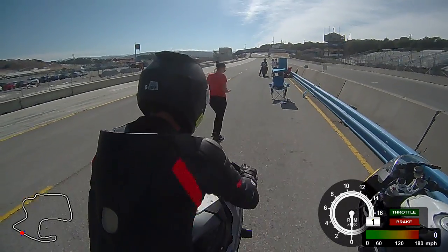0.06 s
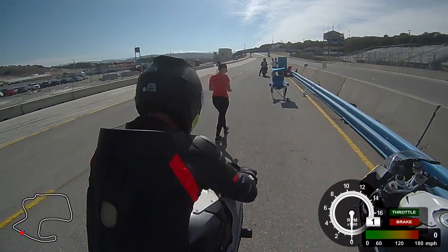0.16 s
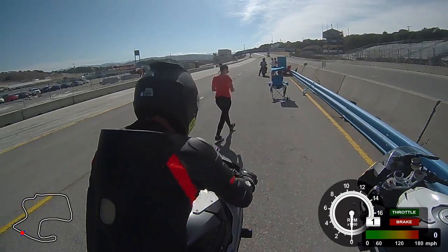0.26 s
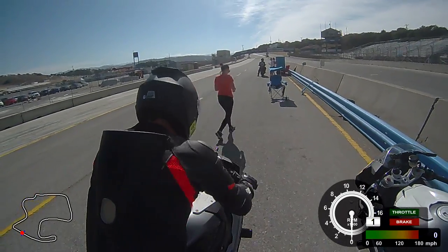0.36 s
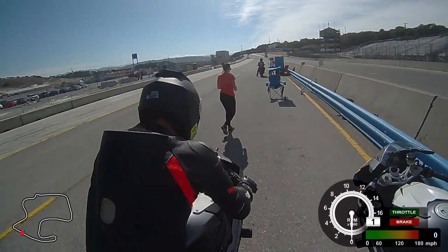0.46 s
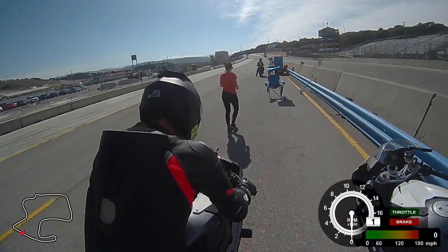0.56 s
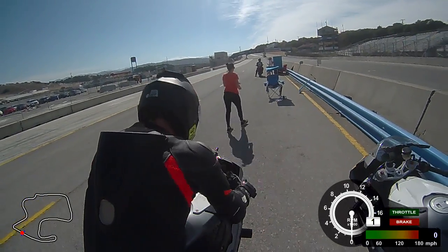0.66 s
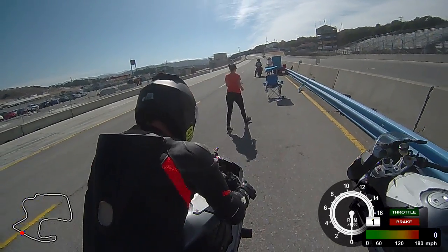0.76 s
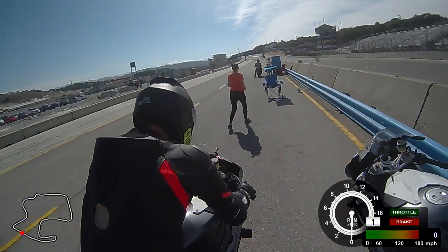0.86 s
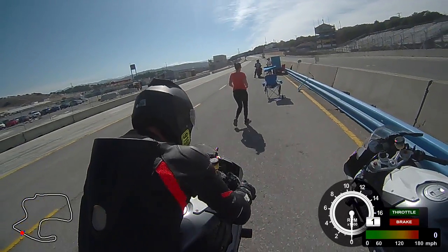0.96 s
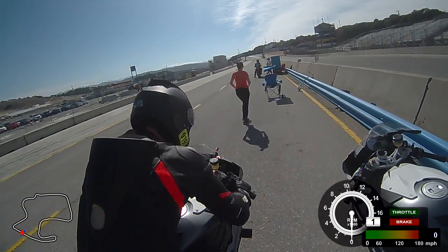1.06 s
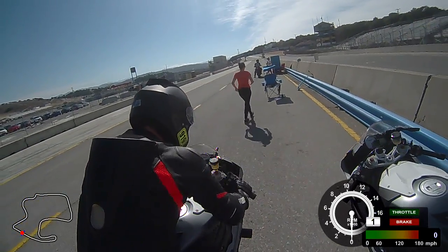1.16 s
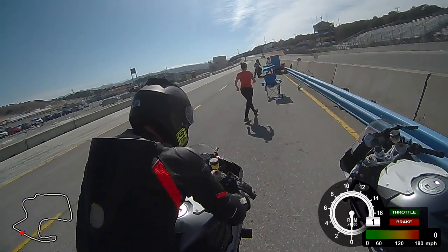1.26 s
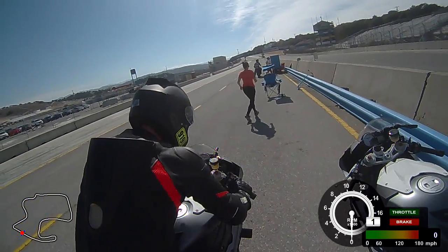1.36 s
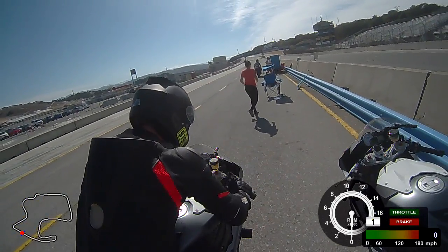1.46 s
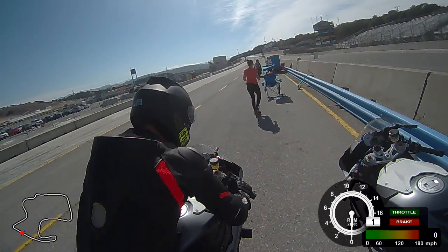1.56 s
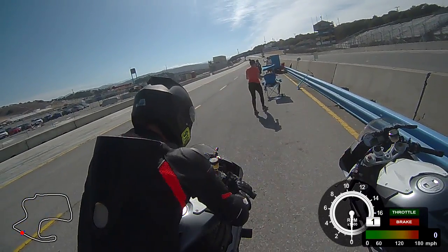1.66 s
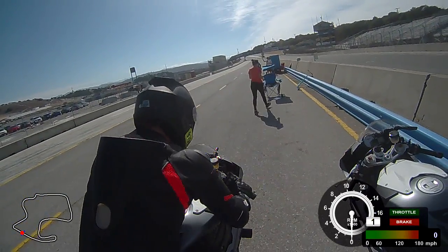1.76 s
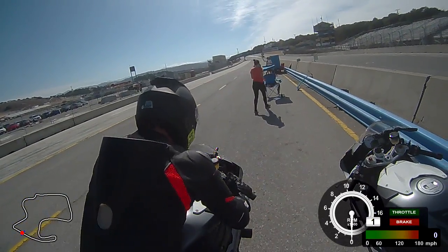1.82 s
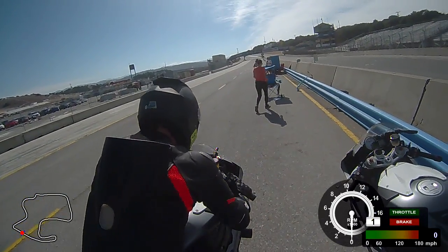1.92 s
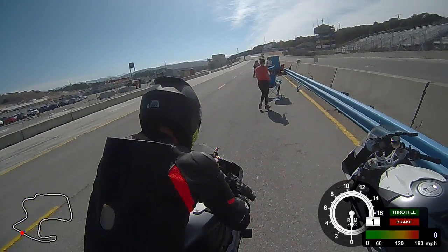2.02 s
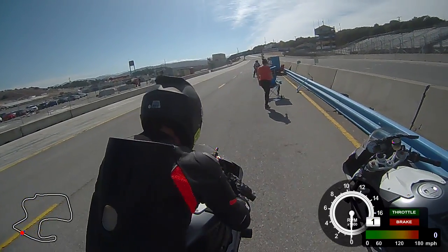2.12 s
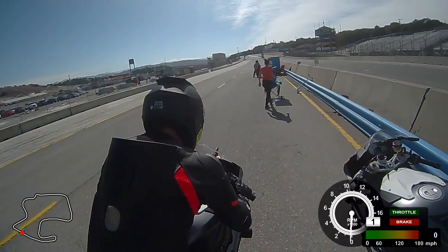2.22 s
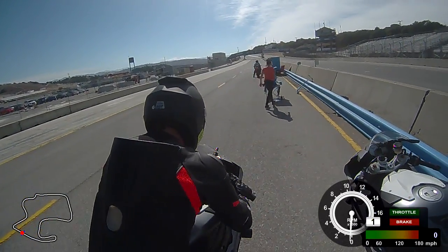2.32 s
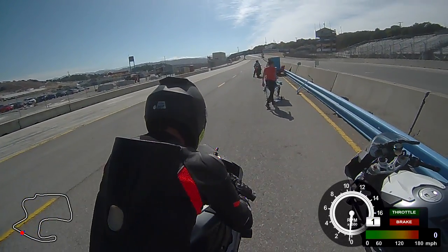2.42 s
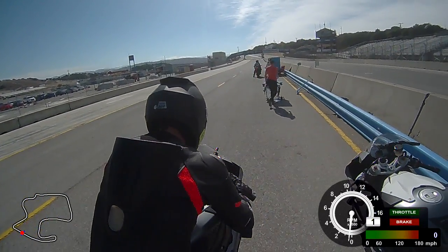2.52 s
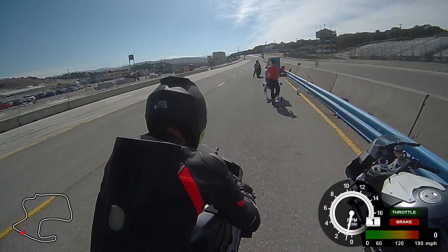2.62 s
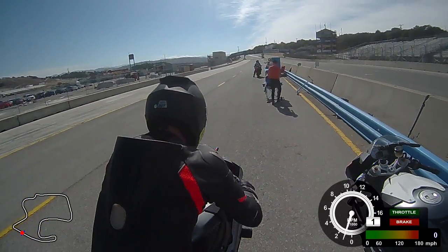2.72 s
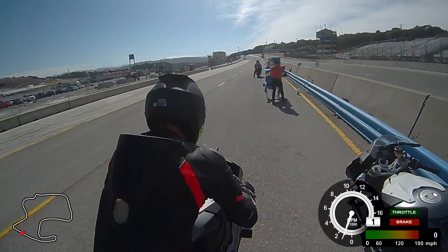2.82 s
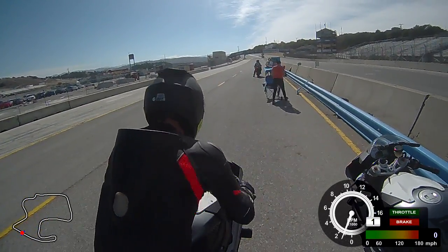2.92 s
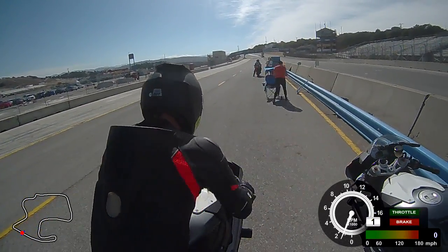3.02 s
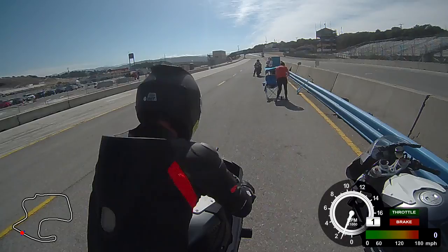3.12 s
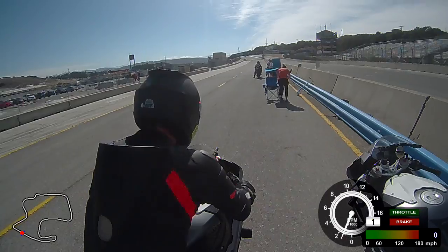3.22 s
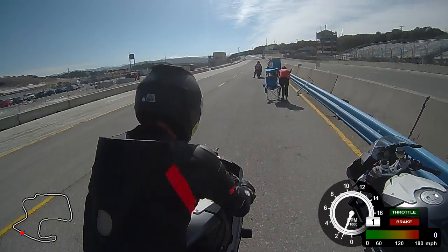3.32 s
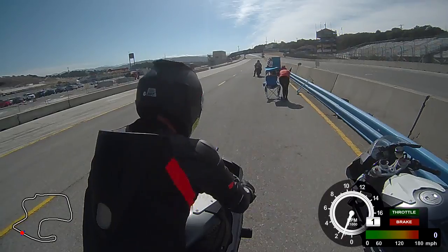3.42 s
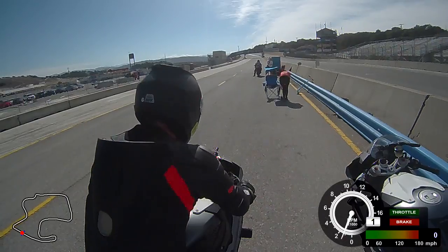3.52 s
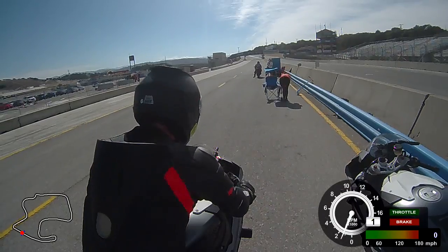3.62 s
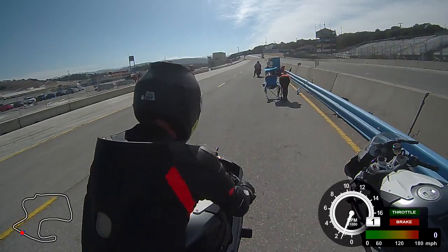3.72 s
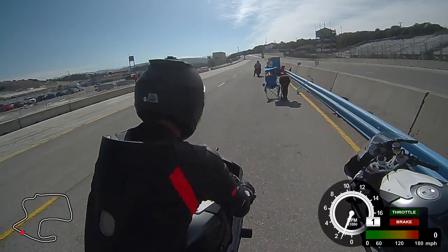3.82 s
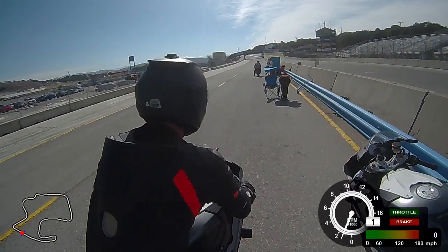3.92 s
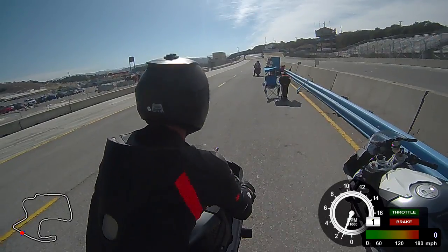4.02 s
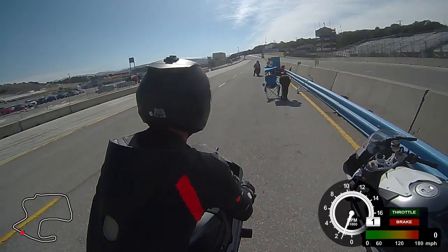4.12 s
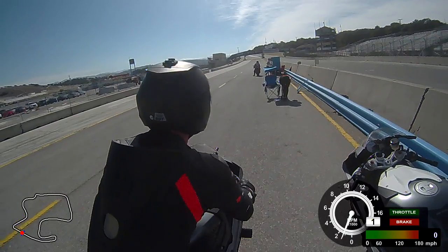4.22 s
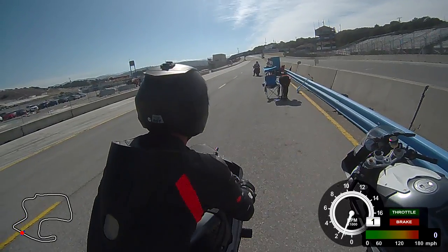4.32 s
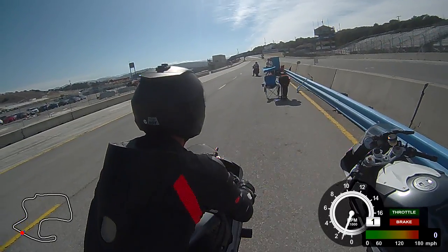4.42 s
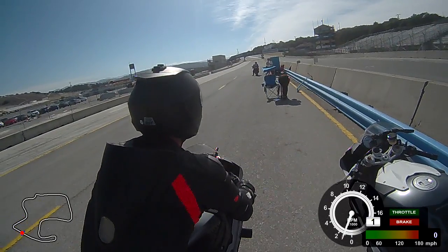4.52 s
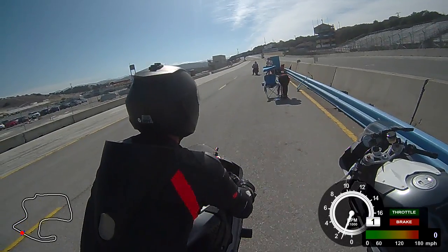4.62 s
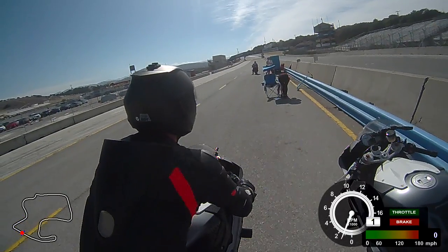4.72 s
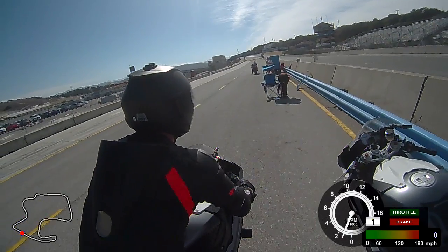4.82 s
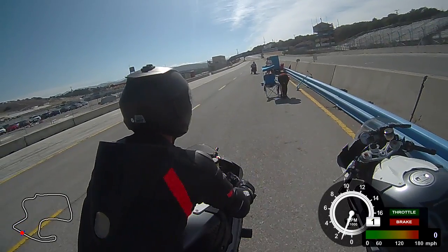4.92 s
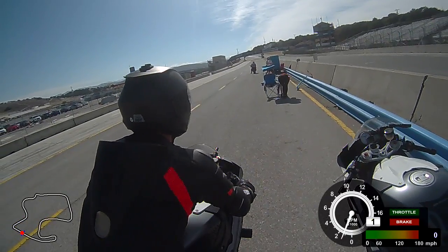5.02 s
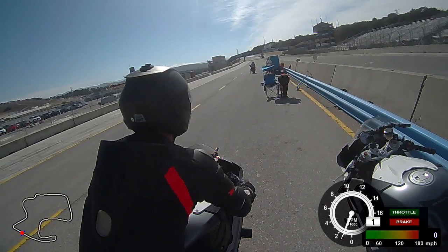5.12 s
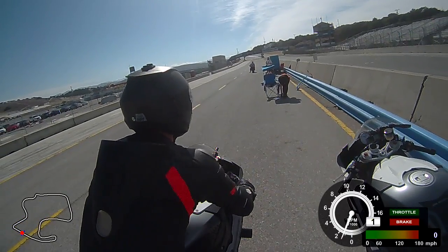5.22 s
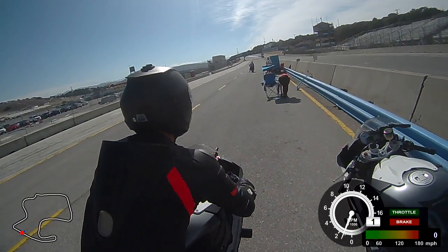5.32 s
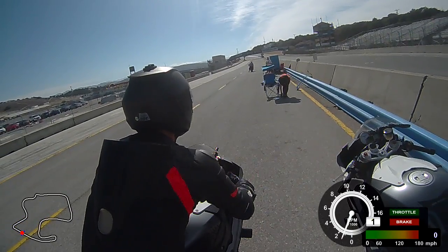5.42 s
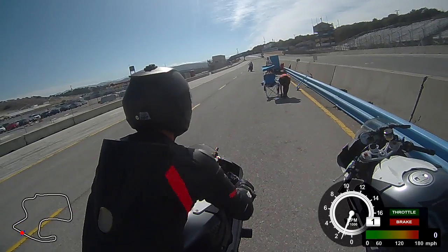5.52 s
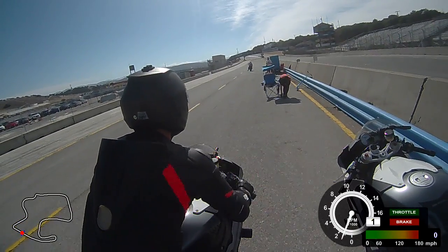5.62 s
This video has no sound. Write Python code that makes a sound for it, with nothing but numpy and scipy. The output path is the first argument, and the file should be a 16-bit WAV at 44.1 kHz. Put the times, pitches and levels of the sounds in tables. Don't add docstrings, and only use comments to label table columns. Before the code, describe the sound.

Quiet hiss with a few muffled bumps as the rider shifts, a light switch click, then a sharp metal clack, by far the loudest event. After a pause the starter heaves, chugging in rapid whining strokes. The four-cylinder engine fires, flares and holds a rough low idle to the end. Everything rings through the frame into a close, sealed microphone with muted treble.

```python
import sys
import numpy as np
from scipy import signal
from scipy.fft import rfft, irfft, next_fast_len
from scipy.io import wavfile
from scipy.ndimage import uniform_filter1d

SR = 44100
rng = np.random.default_rng(int(sys.argv[2]) if len(sys.argv) > 2 else 0)


def voltage_ratio(decibels):
    exponent = np.asarray(decibels, float) / 20
    return 10 ** exponent


def wav_out(sig):
    wavfile.write(sys.argv[1], SR, np.round(np.clip(np.atleast_2d(sig).T, -1, 1) * 32767).astype(np.int16))


N = 250047
T = np.arange(N) / SR

# time in seconds, tooth mesh in Hz, grind in dB, whine in dB.
FIRST_HEAVE = [
    (1.846, 255, -32, -36),
    (1.864, 258.4, -33, -23.5),
    (1.885, 266.8, -26, -22),
    (1.908, 291.8, -25.5, -31.5),
    (1.929, 293, -22.5, -19),
    (1.959, 272.1, -24, -15.5),
    (1.974, 261.1, -24.5, -26),
    (1.993, 265.8, -26.5, -14.5),
    (2.015, 257.9, -31.5, -42),
]
# start in seconds, length in seconds, grind in dB,
# whine in dB, tooth mesh at the start in Hz.
COMPRESSIONS = [
    (2.046, 0.025, -26, -20.5, 293.5),
    (2.122, 0.028, -28.5, -17, 302),
    (2.196, 0.03, -27.5, -21, 293),
    (2.266, 0.035, -29, -16, 304.5),
    (2.341, 0.0092, -33.5, -29, 288),
    (2.392, 0.025, -23, -20, 277),
]
ENGAGE_S = 0.0071


def evened(x):
    return x / np.sqrt(np.mean(x ** 2) + 1e-20)


def wander(samples, shape=N):
    return evened(uniform_filter1d(rng.standard_normal(shape), samples))


def colour(x, points):
    size = next_fast_len(len(x))
    hz, db = np.transpose(points)
    log_hz = np.log(np.fft.rfftfreq(size, 1 / SR) + 1)
    gain = voltage_ratio(np.interp(log_hz, np.log(hz + 1), db))
    return irfft(rfft(x, size) * gain, size)[:len(x)]


def frame(x):
    # frequency in Hz, width in Hz, level in dB.
    frame_modes = [(135, 30, -11.5), (163.6, 14, -3.5), (241, 27.3, 2), (294, 52, -1), (363, 39, -0.5),
                   (434, 12, 1.5), (557.3, 47.5, -2.5), (795.4, 87, -6), (953, 39, -3), (1017, 85, -7),
                   (1217, 48, -0.5), (1336, 60, -4.5), (1627.2, 28.3, 7.5), (1702, 49, -4.5),
                   (2240, 26.7, -12), (2394, 155, -14.5), (2723, 121, -10.5), (2870, 67, -9.5),
                   (3020, 33, -12), (3565, 58, -10), (3822, 39, -12.5), (4089, 132, -7.5), (4343, 31, -5),
                   (4650, 140, -22), (4993, 33, -17.5), (5273, 67, -24), (5735, 102, -22),
                   (6052, 124, -24.5), (6530, 1500, -47.5), (7900, 120, -43.5)]
    twin = 13
    t = T[:8192]
    response = np.zeros(len(t))
    for k, (hz, width, db) in enumerate(frame_modes):
        sign = (-1) ** (k + (k == twin))
        decay = np.exp(-np.pi * width * t)
        response += sign * voltage_ratio(db) * width * decay * np.sin(2 * np.pi * hz * t)
    return signal.oaconvolve(x, response)[:N]


def grit(spread_db, per_s):
    return rng.standard_normal(N) * voltage_ratio(spread_db * wander(int(SR / per_s)))


def through_frame(envelope, points, contacts):
    contacts = colour(contacts, points)
    steady = frame(contacts[:N // 4])[:N // 4]
    return frame(envelope * contacts) / np.sqrt(np.mean(steady ** 2))


def burst(s, length, rise, t60):
    out = np.zeros(N)
    at = slice(max(int(s * SR), 0), int((s + length + 2 * t60) * SR))
    attack = np.clip((T[at] - s) / rise, 0, 1)
    out[at] = attack * voltage_ratio(-60 * np.maximum(T[at] - s - length, 0) / t60)
    return out


def blows(rows, points):
    envelope = sum(voltage_ratio(db) * burst(s, length, 0.00036, t60) for s, db, length, t60 in rows)
    return through_frame(envelope, points, grit(0.46, 550))


def ring(s, modes, rise, flutter_db):
    onset = np.clip((T - s) / 0.033, 0, 1)
    flutter = voltage_ratio(flutter_db * wander(400, (len(modes), N)) * onset)
    return sum(f * voltage_ratio(db) * burst(s, rise, rise, t60) * np.sin(2 * np.pi * hz * (T - s))
               for f, (hz, db, t60) in zip(flutter, modes))


def dents(rows):
    return sum(db * np.exp(-((T - at) / half) ** 2) for at, db, half in rows)


def hiss():
    # frequency in Hz, level in dB.
    hiss_tone = [(12, -35), (20, -7), (54, 3.5), (75, -4), (296, -2.5), (336, -2.5), (634, -5), (952, -7),
                 (1030, -7), (1320, -8), (3480, -10.5), (6910, -15), (8680, -32.5), (11300, -67),
                 (19100, -120)]
    return voltage_ratio(-50) * evened(colour(rng.standard_normal(N), hiss_tone))


def thumps():
    # start in seconds, peak in dB, pitch in Hz, length in seconds.
    shifts = [(.003, -37.5, 201, 0.023), (0.014, -44, 331, .03), (.04, -40.5, 219.5, 0.011),
              (.09, -46, 202, 0.0073), (.537, -41, 164, 0.025), (.556, -41, 169, 0.023),
              (.582, -46.5, 192, .022), (1.075, -48, 171, .016), (1.15, -49, 175, 0.037),
              (1.183, -46, 185, 0.017), (1.212, -42, 184, 0.0091), (1.237, -43, 205, .012),
              (1.278, -46, 230, .011), (1.345, -52.5, 176, .035)]
    # start in seconds, peak in dB, pitch in Hz, t60 in seconds.
    jolts = [(1.434, -34, 55, .15), (1.436, -17.5, 157.6, 0.057), (1.5, -41, 322, 0.23),
             (1.463, -22.5, 222, 0.043), (1.487, -30.5, 150, .08), (1.523, -42.5, 95.5, 0.39),
             (1.553, -41, 269, 0.12), (1.586, -41, 243, 0.12), (1.64, -42, 272, 0.1),
             (1.842, -36, 121, 0.23), (1.87, -29, 205, 0.25), (2.414, -18, 156.3, 0.17),
             (2.45, -22, 164, 0.065), (2.478, -28, 202, 0.039)]
    drift = 0.1 * np.cumsum(wander(300)) / SR
    swings = [(s, db, hz, burst(s, length, 0.0034, 0.05)) for s, db, hz, length in shifts]
    swings += [(s, db, hz, burst(s, 0.0096, 0.011, t60)) for s, db, hz, t60 in jolts]
    out = np.zeros(N)
    for s, db, hz, shape in swings:
        elapsed = T - s + drift - drift[round(s * SR)]
        out += voltage_ratio(db) * shape * np.sin(2 * np.pi * hz * elapsed)
    return out


def switch():
    # frequency in Hz, peak in dB, t60 in seconds.
    switch_modes = [(830, -33.5, 0.031), (920, -37, 0.043), (1604, -36.5, 0.047), (1696, -39, .04)]
    # start in seconds, level in dB, rattle length in seconds, tail t60 in seconds.
    rattles = [
        (1.192, -44, 0.0078, 0.033),
        (1.213, -49, 0.0089, .05),
    ]
    # frequency in Hz, level in dB.
    rattle_tone = [(300, -30), (700, -4), (850, 14), (1050, -19), (1400, -21), (1700, 4), (2000, -25)]
    return ring(1.18, switch_modes, 0.0072, 1.2) + blows(rattles, rattle_tone)


def lever():
    # frequency in Hz, peak in dB, t60 in seconds.
    lever_modes = [(1167, -3.5, 0.016), (838, -12, 0.065), (1520, -19, 0.057), (751, -24, 0.24),
                   (1000, -29, 0.38), (1085, -22, 0.25), (1160, -50, 0.17), (1270, -32, 0.31),
                   (1365, -27, 0.29), (1540, -39.5, .25), (3000, -35, 0.18), (2330, -41, 0.32)]
    # start in seconds, level in dB, rattle length in seconds, tail t60 in seconds.
    snaps = [
        (1.4328, -8, 0.0088, 0.033),
        (1.466, -33, 0.0072, 0.23),
    ]
    # frequency in Hz, level in dB.
    snap_tone = [(100, -5), (500, -13.5), (800, -1), (1300, 5.5), (1700, -2.5), (2700, -2), (4000, -1),
                 (6200, 10), (9000, 1)]
    # start in seconds, level in dB, rattle length in seconds, tail t60 in seconds.
    rebound = [
        (1.586, -43, 0.013, 0.036),
    ]
    # frequency in Hz, level in dB.
    rebound_tone = [(900, -28), (1400, -20), (1650, 0.1), (1900, -20), (3000, -30)]
    return ring(1.4328, lever_modes, 0.0013, 3.0) + blows(snaps, snap_tone) + blows(rebound, rebound_tone)


def heave(column):
    s, db = np.transpose(FIRST_HEAVE)[[0, column]]
    held = burst(s[0] - ENGAGE_S, s[-1] - s[0] + ENGAGE_S, ENGAGE_S, 0.067)
    return held * voltage_ratio(np.interp(T, s, db))


def starter():
    # frequency in Hz, level in dB.
    grind_tone = [(100, -18), (400, -12), (800, 4), (1200, 3), (1450, -3), (1700, -7), (2000, -12),
                  (3000, -25)]
    # frequency in Hz, level in dB.
    clash_tone = [(1200, -14), (1900, -9.5), (2300, -2.5), (4000, 0), (6000, 0), (7000, 8), (8000, 3.5)]
    thud_tone = [(50, -5), (110, 0.5), (170, 6.5), (250, -7.5), (400, -19.5), (700, -11.0)]
    whirr_s, release_s = FIRST_HEAVE[-1][0], 2.41
    whirr = voltage_ratio(-36) * burst(whirr_s, release_s - whirr_s, 0.02, 0.14)
    heaving = heave(column=2)
    load = heaving + whirr
    clash = heaving * voltage_ratio(-4.0) + whirr * voltage_ratio(-6.0)
    clash += voltage_ratio(-36) * burst(FIRST_HEAVE[0][0] - ENGAGE_S, 0.0051, 0.003, 0.091)
    thud = np.zeros(N)
    for s, length, db, _, _ in COMPRESSIONS:
        push = voltage_ratio(db) * burst(s, length, 0.005, 0.059)
        load += push
        thud += push
        clash += voltage_ratio(db - 1.5) * burst(s, 0.84 * length, 0.0015, 0.15)
        clash += voltage_ratio(db - 10.0) * burst(s, 0.0022, 0.00084, 0.022)
    teeth = grit(1.35, 220)
    grinding = through_frame(load, grind_tone, teeth)
    clashing = through_frame(clash, clash_tone, teeth)
    return grinding + clashing + through_frame(thud, thud_tone, grit(1.0, 130))


def whine():
    # order of the tooth mesh, level in dB.
    tooth_orders = [(2, -18), (3, -3), (4, -5), (5, -14), (6, 0.6), (8, 8.5), (10, -11.5), (13, 10)]
    sag_hz_per_s, sag_s = 950, 0.045
    mesh = [row[:2] for row in FIRST_HEAVE]
    level = heave(column=3)
    for s, _, _, db, hz in COMPRESSIONS:
        mesh += [(s, hz), (s + sag_s, hz - sag_hz_per_s * sag_s)]
        level += voltage_ratio(db) * burst(s, 0.033, 0.023, 0.05)
    hz = np.interp(T, *np.transpose(mesh)) * (1 + 0.01131 * wander(200))
    turns = np.cumsum(hz) / SR
    teeth = np.zeros(N)
    for k, db in tooth_orders:
        fade_db = (k > 6) * 0.5 * (hz - 292.0)
        loaded_db = (k == 8) * 5.5 * (T > COMPRESSIONS[0][0])
        teeth += voltage_ratio(db + fade_db - loaded_db) * np.sin(2 * np.pi * k * turns + k * k)
    return frame(level * teeth) * 2 * np.pi / SR


def engine():
    # time in seconds, firings in Hz, shake of the mount in dB.
    idle = [(2.42, 31.4, -60), (2.47, 37.38, -45), (2.53, 41.75, -39), (2.6, 45.34, -44),
            (2.658, 46.2, -51), (2.758, 47.75, -55), (2.841, 46.4, -42.5), (3.28, 43.6, -46.5),
            (3.8, 45.06, -47), (3.999, 43.18, -53), (4.199, 42.47, -50), (4.32, 41.2, -56),
            (4.4, 42.05, -48), (4.701, 41.45, -51), (5.02, 43.24, -51), (5.1, 43.77, -51),
            (5.3, 43.32, -44.5), (5.67, 42.2, -54)]
    # order of the firing rate, level in dB.
    exhaust_orders = [(2, 1.5), (3, 4), (4, 3.5), (5, 1.6), (6, -4.5), (7, -5.5), (8, 0), (9, 1), (10, -10),
                      (12, -3.5)]
    cylinders_db = [-0.12, 1, 0.49, 0.93]
    # frequency in Hz, level in dB.
    clatter_tone = [(100, -15), (450, -5.5), (800, -1.5), (2000, -5.5), (4000, -0.94), (6000, 3.35),
                    (9000, -12)]
    # time in seconds, change in dB, half
    # width in seconds.
    pops = [
        (2.46, -13, 0.036),
        (2.53, 2.5, 0.034),
        (3.28, 2, 0.073),
        (4.65, 1.5, 0.061),
        (5.62, 1.5, 0.056),
    ]
    # time in seconds, change in dB, half width in seconds.
    stumbles = [
        (4.04, -1.5, 0.028),
        (4.915, -1.5, 0.012),
        (4.945, 3, .015),
        (4.992, -5, 0.011),
        (5.11, -2.5, 0.019),
        (5.18, 1, 0.018),
    ]
    wash_tone = [(60, -34.0), (120, 4.0), (400, -8.2), (600, -10.0), (1000, -53.0)]

    s, *columns = np.transpose(idle)
    hz, shake_db = (np.interp(T, s, c) for c in columns)
    since = np.maximum(T - s[0], 0)
    on = np.clip((T - s[0]) / 0.051, 0, 1)
    turns = np.cumsum(hz * (1 + 0.006 * wander(1500))) / SR
    firing = turns.astype(int)
    chance_db = 1.6 * rng.standard_normal(400)[firing % 400]
    strength_db = np.take(cylinders_db, firing % 4) + chance_db
    strength = voltage_ratio(uniform_filter1d(strength_db, 200))

    orders = sum(voltage_ratio(db) * np.cos(2 * np.pi * k * (turns - 0.5) - 1.35 * k * k) for k, db in exhaust_orders)
    pulses = evened(frame(orders * strength))
    puffs = (0.9 + 0.1 * np.cos(np.pi * (turns - 0.5)) ** 2) * strength
    wash = evened(through_frame(puffs, wash_tone, grit(0.63, 350)))
    exhaust_db = -36.5 + 3.5 * np.exp(-since / 0.35) + dents(pops)
    exhaust = voltage_ratio(exhaust_db) * evened(pulses + voltage_ratio(-6.0) * wash)

    knock = 1 + 0.28 * np.cos(2 * np.pi * turns) + 0.1 * np.cos(6 * np.pi * turns)
    knock = evened(knock * strength ** 0.3)
    clatter_db = -29 + 6 * np.exp(-since / 0.033) + 3.5 * np.exp(-since / 0.3) + dents(stumbles)
    clatter = through_frame(on * voltage_ratio(clatter_db) * knock, clatter_tone, grit(0.22, 400))

    throb_db = shake_db + 2.5 + 0.8 * uniform_filter1d(strength_db, 1500)
    throb = voltage_ratio(throb_db) * np.sin(2 * np.pi * turns)
    return on * (exhaust + throb) + clatter


def scene():
    return (thumps() + switch() + lever() + starter() + whine() + engine())[None]


def roll_off(x):
    return signal.sosfilt(signal.butter(12, 8830, fs=SR, output="sos"), x)


def record(dry):
    limited = 0.92 * np.tanh((dry[0] + hiss()) / 0.94)
    cased = colour(limited, [(7600, -0.1), (8300, -4), (8900, -12)])
    return roll_off(cased[None])


dry = scene()
out = record(dry)
wav_out(out)
```